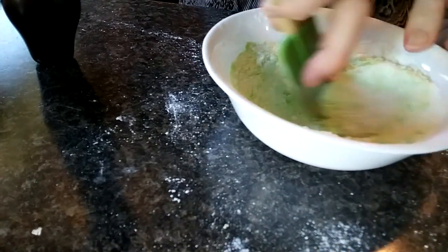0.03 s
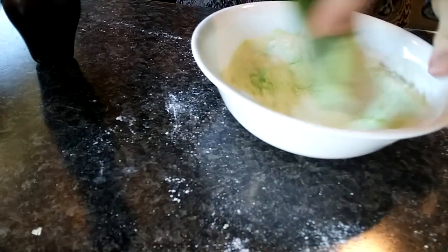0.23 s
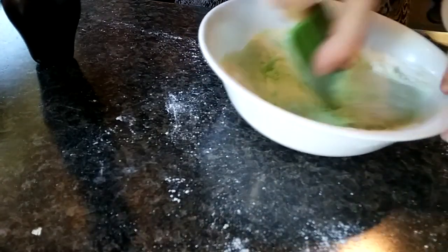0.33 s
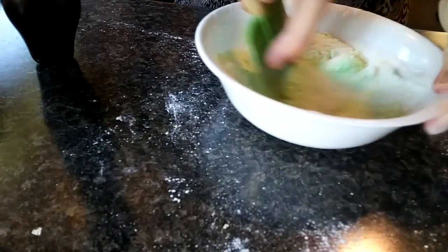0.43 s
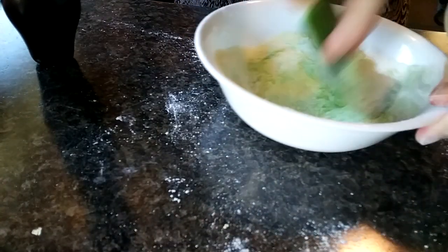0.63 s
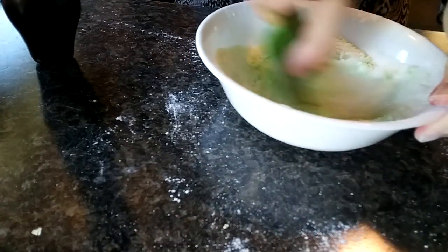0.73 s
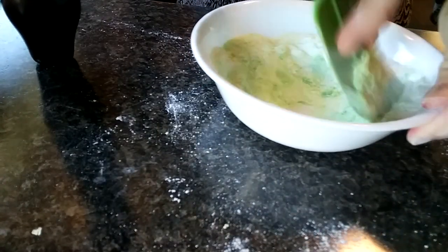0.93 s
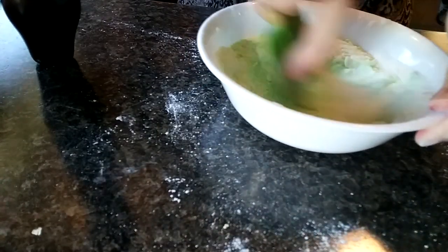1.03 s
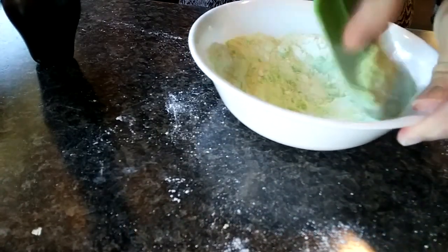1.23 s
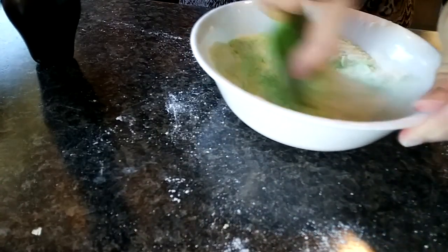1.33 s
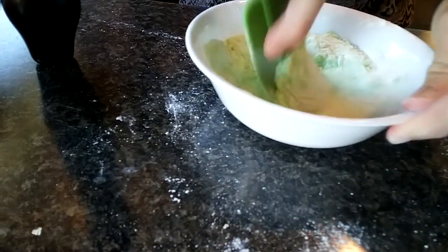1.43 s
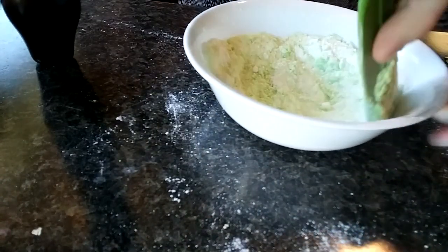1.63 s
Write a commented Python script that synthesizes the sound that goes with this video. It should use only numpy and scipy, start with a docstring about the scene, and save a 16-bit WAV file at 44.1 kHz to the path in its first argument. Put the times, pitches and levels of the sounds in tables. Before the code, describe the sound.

Close stereo sound of damp powder being stirred in a bowl: quick crunchy taps and faint scrapes, strongest near half a second, then sparser lighter strokes, with low bumps from the counter and faint room tone.

```python
"""Stirring damp sand in a bowl

A silicone spatula stirs damp sandy powder in a ceramic bowl held on a stone counter, close to a stereo microphone.
Random grain clicks hiss under each stroke. Uneven rubbing and knocks ring the damped bowl in a hollow murmur.
The bowl's foot thumps and rocks on the counter, ringing the slab and the cabinet under it.
A short kitchen echo follows the grit and the bowl, over faint room tone."""
import sys
import numpy as np
from scipy import signal
from scipy.fft import rfft, irfft, next_fast_len
from scipy.io import wavfile

SR = 44100
rng = np.random.default_rng(int(sys.argv[2]) if len(sys.argv) > 2 else 0)


def ratio_of_db(decibels):
    """Turn decibels (scalar or array-like) into linear amplitude factors; 0 dB maps to 1."""
    return 10 ** (np.asarray(decibels, float) / 20)


def pcm_store(signal):
    """Save signal as 16-bit PCM."""
    levels = np.round(np.clip(np.atleast_2d(signal), -1, 1) * 32767)
    wavfile.write(sys.argv[1], SR, levels.astype(np.int16).T)


N = 74970  # length in samples

# The blade slaps the wall and the powder. Levels are relative. Each row: start in seconds, crunch in dB,
# push on the bowl in dB, time for the crunch to fall 60 dB in seconds, extra crunch below the split in dB.
SLAPS = [(0.175, -44, -22, 0.032, 17), (0.1945, -24, -15.5, 0.013, 2), (0.2042, -11.5, -15, 0.013, 3),
         (0.22, -34, -11.5, 0.035, 29), (0.2285, -19, -13.5, 0.013, 20), (0.3925, -40, -30, 0.016, -3),
         (0.4311, -8.5, -16, 0.0089, -6), (0.4362, -26.5, -17, 0.039, -18), (0.446, -24, -28, 0.02, 5),
         (0.5125, -10.5, -13.5, 0.02, -14), (0.528, -11, -13, 0.031, 5.5), (0.5314, -11.5, -2, 0.012, 3.5),
         (0.7087, -60, -31, 0.029, -1), (0.7388, -37, -26.5, 0.035, -2), (0.783, -20.5, -25, 0.022, 6),
         (0.8364, -48, -28, 0.018, -12), (0.958, -40, -71, 0.029, 6), (1.0705, -35.5, -22, 0.01, 28),
         (1.0778, -43, -11, 0.016, -16), (1.0827, -31.5, -32, 0.04, -18), (1.098, -29.5, -44, 0.062, -8),
         (1.1116, -23.5, -18, 0.028, 5), (1.1301, -51, -29, 0.028, 5), (1.3735, -33, -29, 0.013, -16),
         (1.388, -14, -17.5, 0.022, 3), (1.4085, -50, -17.5, 0.01, 0), (1.4126, -20.5, -28, 0.023, 0.5),
         (1.6751, -28.5, -22.5, 0.044, -31), (1.6878, -34, -25.5, 0.056, -27)]


def rms_one(x):
    """Scales a sound to an rms level of 1."""
    return x / np.sqrt(np.mean(x ** 2) + 1e-20)


def at_hz(points, hz):
    """Reads a curve of (Hz, value) points, with straight lines along log frequency."""
    curve_hz, values = np.transpose(points)
    return np.interp(np.log(hz), np.log(curve_hz), values)


def one_pole(x, seconds):
    """Smoothing low-pass with unit gain at the lowest frequencies."""
    r = np.exp(-1 / (seconds * SR))
    return signal.lfilter([1 - r], [1, -r], x + 1e-18)


def drift(rate):
    """Slow random wandering with an rms of 1: noise smoothed twice at the given rate in Hz."""
    smoothing = 1 / (2 * np.pi * rate)
    noise = rng.standard_normal(N + SR)
    slow = one_pole(one_pole(noise, smoothing), smoothing)
    return rms_one(slow[SR:])  # the first second lets the smoothing settle


def grains(rate, spread_db, channels):
    """Random clicks of uneven size and either sign, with an rms of 1; rate is clicks per second."""
    shape = (channels, N)
    size_db = spread_db * np.minimum(rng.exponential(1, shape), 5)
    sizes = ratio_of_db(size_db) * rng.choice([-1, 1], shape)
    happens = rng.random(shape) < rate / SR
    return rms_one(sizes * happens)


def swells(middle, half, db):
    """Envelope of bell-shaped swells."""
    t = np.arange(N) / SR - middle[:, None]
    return np.sum(ratio_of_db(db)[:, None] * np.exp(-(t / half[:, None]) ** 2), axis=0)


def bursts(s, db, t60):
    """Envelope that leaps up at each time and dies away."""
    rise_s = 0.0025
    t = np.maximum(np.arange(N) / SR - s[:, None], 0)
    decay = ratio_of_db(-60 * t / t60[:, None])
    return np.sum(ratio_of_db(db)[:, None] * decay * (1 - np.exp(-t / rise_s)), axis=0)


def ring(drive, modes):
    """The drive sets every mode ringing: each is a two-pole resonator that dies away at its own pace."""
    out = 0
    for hz, db, t60 in modes:
        r = ratio_of_db(-60 / (t60 * SR))
        w = 2 * np.pi * hz / SR
        out = out + ratio_of_db(db) * signal.lfilter([0, np.sin(w)], [1, -2 * r * np.cos(w), r * r], drive + 1e-18)
    return out


def at_microphones(pair, spectrum, patchy_db):
    """Third-octave bands: two drives mix to left and right by likeness and leaning, coloured and patchy."""
    # How alike left and right are. Each row: frequency in Hz, likeness from -1 to 1.
    likeness = [(60, 0.97), (130, 0.94), (290, 0.89), (640, 0.65), (1410, 0.25), (3100, 0.14), (6820, 0.07),
                (15000, -0.02)]
    # Which side is louder. Each row: frequency in Hz, left minus right in dB.
    leaning = [(60, .5), (1000, -.5), (3000, -.5), (5500, 2), (7500, 1), (8600, -8), (11000, -9.5),
               (16000, -9)]
    edges = 35 * 2 ** np.arange(0, 9.2, 1 / 3)  # Hz
    out = 0
    for k, (low, high) in enumerate(zip(edges, edges[1:])):
        band = signal.butter(2, [low, high], "band", fs=SR, output="sos")
        mid, side = signal.sosfilt(band, pair)
        hz = np.sqrt(low * high)
        alike = at_hz(likeness, hz)
        stereo = np.sqrt(1 + alike) * mid + np.sqrt(1 - alike) * side * [[1], [-1]]
        lean = ratio_of_db(at_hz(leaning, hz) / 2 * np.array([[1], [-1]]))
        gain = ratio_of_db(at_hz(spectrum, hz) + patchy_db * drift(26.5))
        out = out + gain * (-1) ** k * lean * stereo  # every other band is flipped in sign
    return out


def grit():
    """Sand grains snap under the blade; each sweep and slap has its own balance of low and high grit."""
    # Sweeps of the blade through the powder swell and fade. Each row: middle in seconds,
    # half length in seconds, relative grit level in dB, extra level below the split in dB.
    sweeps = [(0.009, 0.054, -53, -11), (0.093, 0.028, -48.5, -39), (0.168, 0.04, -44, -3),
              (0.217, 0.023, -43, 22), (0.25, 0.013, -57, 2), (0.307, 0.037, -51, -15),
              (0.41, 0.068, -48.5, -29), (.44, 0.024, -41.5, 9), (0.5, 0.057, -62, 9),
              (0.551, 0.043, -41, 9.5), (0.614, 0.066, -56, 17), (0.75, 0.034, -46.5, -24),
              (0.798, 0.015, -54, 3), (0.881, 0.039, -36, -2.5), (0.944, 0.019, -52, -5),
              (1.083, 0.011, -34, -9), (1.143, 0.061, -54.5, 3), (1.193, 0.036, -39.5, -1),
              (1.268, 0.016, -55.5, 3.5), (1.385, 0.013, -36.5, -7), (1.415, 0.022, -43.5, -21),
              (1.5, 0.045, -40.5, -3.5), (1.585, 0.064, -58.5, 8), (1.69, 0.035, -49.5, -44)]
    # Colour of the grit. Each row: frequency in Hz, relative level in dB per Hz.
    colour = [(700, -8), (1000, -13.5), (1500, -10.5), (2800, -14.5), (4000, -13.5), (5000, -18.5),
              (6500, -8), (8000, -15), (10500, -12), (13000, -31), (15500, -9), (17000, -30)]
    split_hz = 2660
    s, crunch_db, _, crunch_t60, slap_low_db = np.transpose(SLAPS)
    middle, half, sweep_db, sweep_low_db = np.transpose(sweeps)
    flutter = ratio_of_db(1.22 * drift(29))
    clicks = grains(9700, 0.5, channels=2)
    out = 0
    for kind, low in (("high", 0), ("low", 1)):
        force = flutter * swells(middle, half, sweep_db + low * sweep_low_db)
        force = force + bursts(s, crunch_db - 1.5 + low * slap_low_db, crunch_t60)
        split = signal.butter(2, split_hz, kind, fs=SR, output="sos")
        out = out + signal.sosfilt(split, force * clicks) * (-1) ** low  # the flip avoids a notch at the split
    return at_microphones(out, colour, patchy_db=3.0) * ratio_of_db(2.0)


def bowl(rub_db):
    """Uneven slips of the soft blade and one knock a slap ring the damped bowl, which radiates little bass."""
    # Damped bowl with powder. Each row: frequency in Hz, relative level in dB, time to fall 60 dB in seconds.
    modes = [(530, -7, .08), (572, -8, .05), (615, -2, .07), (665, -6, .04), (735, -5, .035),
             (805, -8, .03), (875, -9, .035), (1210, -12, .02), (1405, -14, .05), (1715, -16, .05),
             (1965, -15, .07), (2570, -18, .04), (2750, -16, .045), (3340, -18, .05)]
    knock_lag_s, scuff_t60_s = 0.001, 0.014
    soft_blade_hz, bass_cut_hz = 1100, 460
    s, _, push_db, _, _ = np.transpose(SLAPS)
    force = ratio_of_db(rub_db + 2 * drift(32))
    force = force + bursts(s, push_db - 10, np.full(len(s), scuff_t60_s))
    drive = force * grains(4000, 2.5, channels=2)
    # each knock has a full middle part and a random side part
    knock_at = ((s + knock_lag_s) * SR).astype(int)
    drive[:, knock_at] += ratio_of_db(push_db + 10.5) * np.stack([np.ones(len(s)), rng.uniform(-1.1, 1, len(s))])
    slips = one_pole(drive, 1 / (2 * np.pi * soft_blade_hz))
    bass_cut = signal.butter(4, bass_cut_hz, "high", fs=SR, output="sos")
    mid, side = signal.sosfilt(bass_cut, ring(slips, modes))
    return (mid + ratio_of_db(-7.5) * side * [[1], [-1]]) * ratio_of_db(-25.0)


def counter(rock_db):
    """Thumps and soft rocking of the foot thud in the slab and boom in the cabinet, almost alike both sides."""
    # The foot thumps the counter. Each row: start in seconds, relative thud level in dB,
    # contact time in seconds (from start to peak force, held to 0.0003 or more), relative boom level in dB.
    thumps = [(0.012, -52, .003, -40), (0.099, -55, 0.0034, -33), (0.172, -44, 0.00026, -59),
              (0.206, -45, .0005, -50), (0.2278, -30, 0.00036, -49), (0.392, -26.5, 0.0011, -56),
              (0.436, -37, 0.0017, -55), (0.53, -10.5, 0.00097, -18.5), (0.539, -24, 0.00098, -26),
              (0.632, -50, 0.0045, -18), (0.735, -29, 0.00073, -30), (0.845, -43, 0.00037, -55),
              (1.075, -31.5, 0.00054, -39.5), (1.111, -40, 0.00026, -73), (1.191, -46, 0.00059, -42.5),
              (1.377, -33.5, 0.00088, -40), (1.399, -43, 0.00096, -25.5), (1.404, -25, 0.00063, -34),
              (1.496, -54, .002, -29.5), (1.677, -33, 0.00061, -32.5)]
    # Counter slab. Each row: frequency in Hz, relative level in dB, time to fall 60 dB in seconds.
    slab = [(109, -6.5, 0.03), (148, -10, 0.065), (195.2, 2, 0.053), (223, 0.5, 0.059), (280.7, 0, 0.1),
            (337, -5, 0.085)]
    # Cabinet under the slab. Each row: frequency in Hz, relative level in dB, time to fall 60 dB in seconds.
    cabinet = [(64, -2, .26), (83, 0, .32)]
    s, thud_db, contact, boom_db = np.transpose(thumps)
    contact = np.clip(contact, .0003, .01)[:, None]
    t = np.maximum(np.arange(N) / SR - s[:, None], 0)
    blows = t / contact ** 2 / SR * np.exp(-t / contact)
    smoothing = 1 / (2 * np.pi * 340)  # rocking is dulled above 340 Hz
    rocking = ratio_of_db(rock_db - 31.5) * rng.standard_normal((2, N))
    rocking = one_pole(one_pole(rocking, smoothing), smoothing)
    thud_blows = ratio_of_db(thud_db) @ blows * [[1], [.3]]  # middle and side
    boom_blows = ratio_of_db(boom_db) @ blows * [[1], [.3]]
    thud = ring(rocking + thud_blows, slab)
    boom = ring(rocking * ratio_of_db(-12 + 3 * drift(12)) + boom_blows, cabinet)
    mid, side = thud + boom
    return mid + ratio_of_db(-13.0) * side * [[1], [-1]]


def kitchen(x):
    """Echo of the kitchen: six feedback delays a side, duller on every round."""
    t60_s, wall_cut_hz = 0.37, 6800
    size = next_fast_len(N + SR)
    w = 2 * np.pi * np.arange(size // 2 + 1) / size
    dull = 1 / (1 + 1j * w * SR / (2 * np.pi * wall_cut_hz))
    loops = []
    for lag in rng.uniform(0.0058, 0.049, 12):  # seconds
        loops.append(ratio_of_db(-60 * lag / t60_s) * dull * np.exp(-1j * w * lag * SR))
    # g / (1 - g) adds up all the rounds of one loop
    echo = np.array([sum(g / (1 - g) for g in loops[side::2]) for side in (0, 1)])
    return irfft(rfft(x, size) * echo, size)[:, :N]


def room_tone():
    """Faint steady background: noise shaped band by band, each wavering slightly."""
    # Colour of the background. Each row: frequency in Hz, relative level in dB per Hz.
    colour = [(35, -19), (80, 2.5), (190, -13), (400, -7.5), (560, -10.5), (1100, -33), (3000, -32.5),
              (6500, -35), (12000, -37.5), (16000, -45)]
    noise = rng.standard_normal((2, N))
    return ratio_of_db(-56.5) * rms_one(at_microphones(noise, colour, patchy_db=1))


def scene():
    """Grit, bowl and counter, with kitchen echo of the grit and bowl, over faint room tone."""
    # Strokes, joined by straight lines. Each row: time in seconds, relative level in dB of the blade
    # rubbing the wall, relative level in dB of the bowl rocking on the counter.
    strokes = [(0.0, -53.5, -48), (0.121, -49.5, -47), (0.16, -43, -47), (0.224, -31, -38),
               (0.264, -39.5, -38.5), (0.364, -42, -43.5), (0.423, -46, -51), (0.437, -30.5, -38),
               (0.49, -49.5, -43), (0.532, -32.5, -37), (0.548, -38, -24.5), (0.568, -37, -28.5),
               (0.7, -50.5, -46.5), (0.748, -45, -38.5), (0.831, -55, -45.5), (0.854, -39, -38),
               (1.037, -69, -80), (1.08, -42.5, -28), (1.098, -53, -46.5), (1.135, -38, -41),
               (1.212, -44, -47), (1.282, -65, -75), (1.358, -70, -61), (1.375, -40, -38.5),
               (1.411, -42, -26.5), (1.438, -47.5, -41), (1.482, -37.5, -39), (1.52, -43.5, -37.5),
               (1.556, -49, -56), (1.657, -62.5, -50), (1.682, -40.5, -61), (1.7, -33.5, -25)]
    s, *columns = np.transpose(strokes)
    rub_db, rock_db = [np.interp(np.arange(N) / SR, s, c) for c in columns]
    sand = grit()
    wall = bowl(rub_db)
    echo = ratio_of_db(-15) * kitchen(sand + ratio_of_db(-6) * wall)
    return sand + wall + echo + counter(rock_db) + room_tone()


def roll_off(x):
    """The treble ends steeply here."""
    return signal.sosfilt(signal.butter(12, 16660, fs=SR, output="sos"), x)


def record(dry):
    """The microphone: low cut, top cut, then resonances of its housing that add to or take from the sound."""
    # Housing resonances. Each row: frequency in Hz, width in Hz, added share (negative takes away).
    housing = [(6500, 140, 0.36), (7420, 280, 0.56), (8990, 1080, -0.77), (10800, 880, 0.099)]
    low_cut = signal.butter(6, 57.2, "high", fs=SR, output="sos")  # Hz
    top_cut = signal.cheby2(10, 50, 16300, fs=SR, output="sos")  # 50 dB down from 16300 Hz up
    x = signal.sosfilt(top_cut, signal.sosfilt(low_cut, dry))
    for hz, width_hz, share in housing:
        x = x + share * signal.lfilter(*signal.iirpeak(hz, hz / width_hz, fs=SR), x)
    return roll_off(x)


dry = scene()
out = record(dry)
pcm_store(out)
```